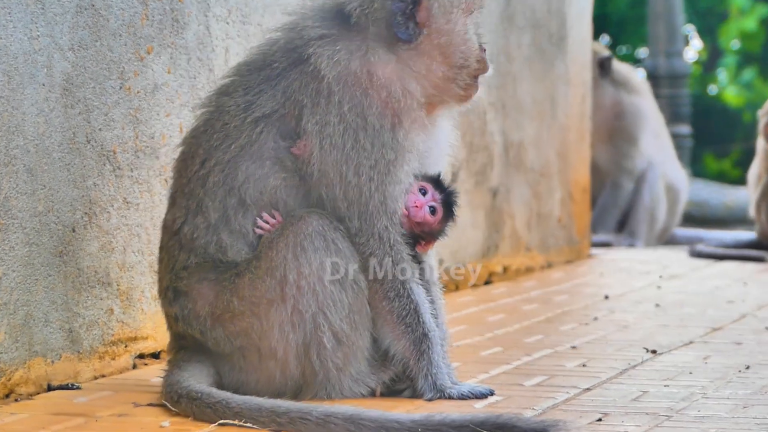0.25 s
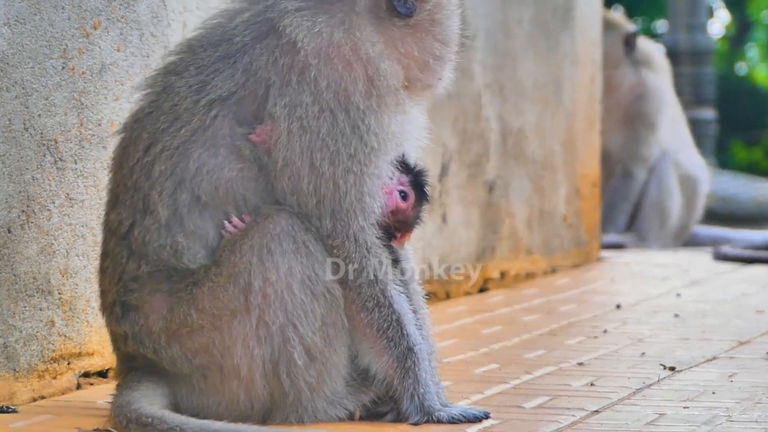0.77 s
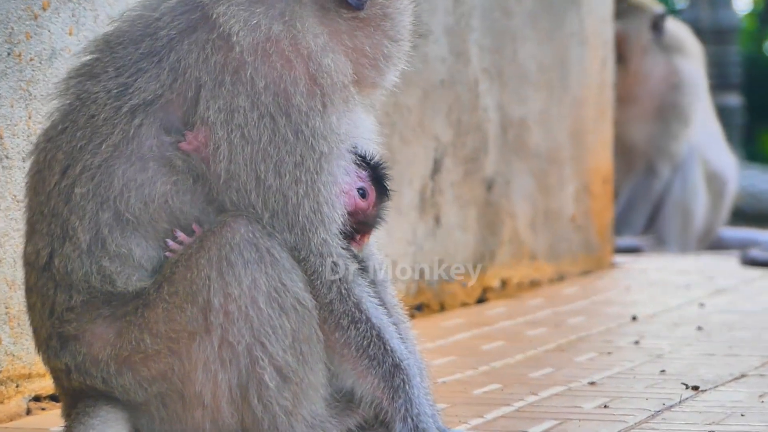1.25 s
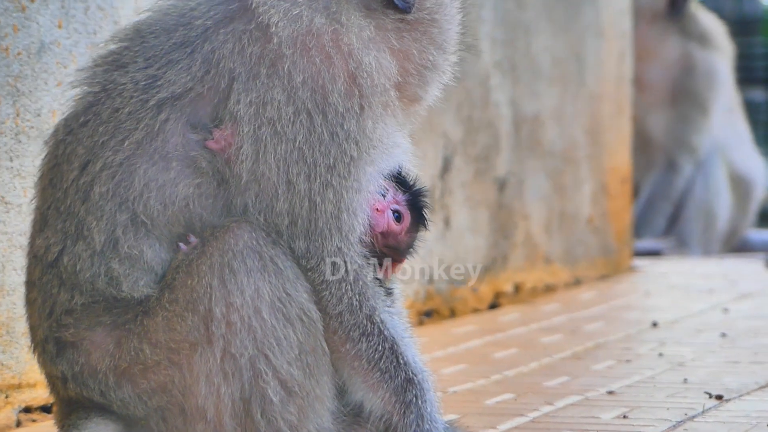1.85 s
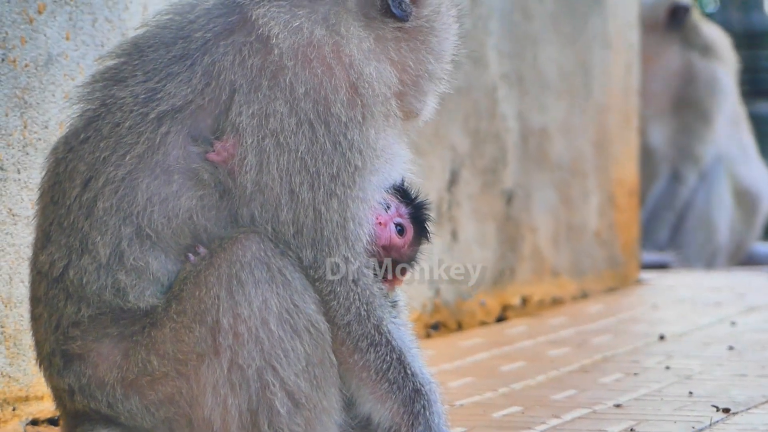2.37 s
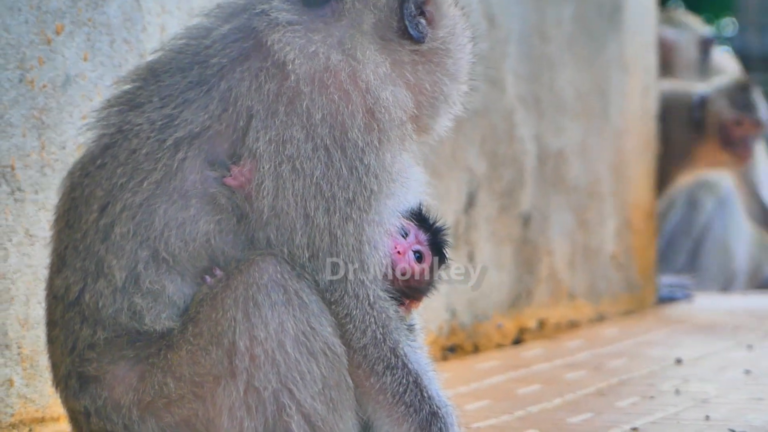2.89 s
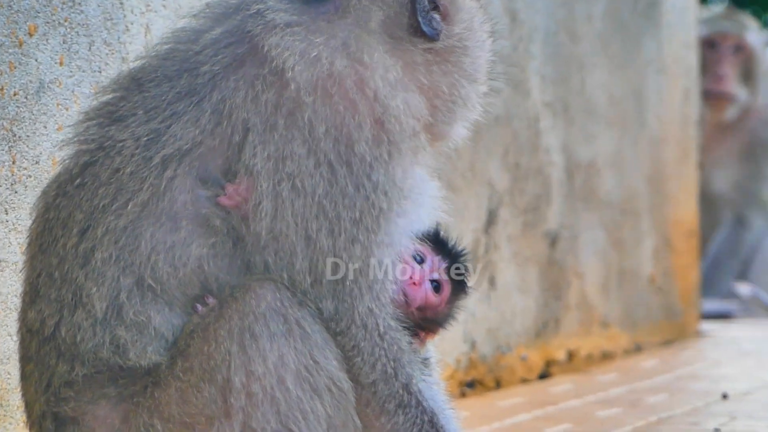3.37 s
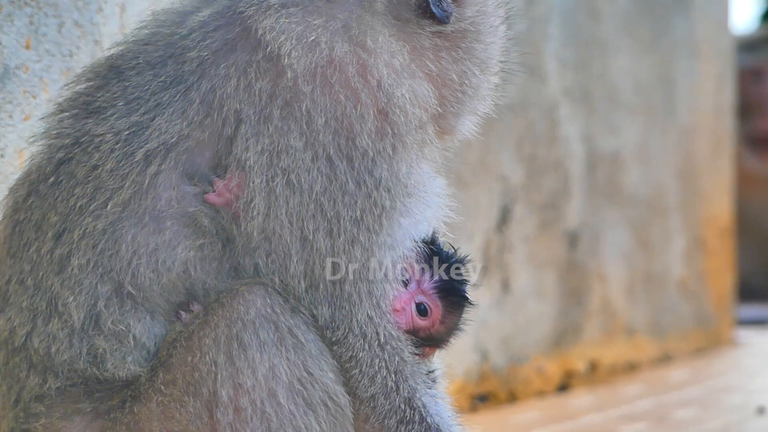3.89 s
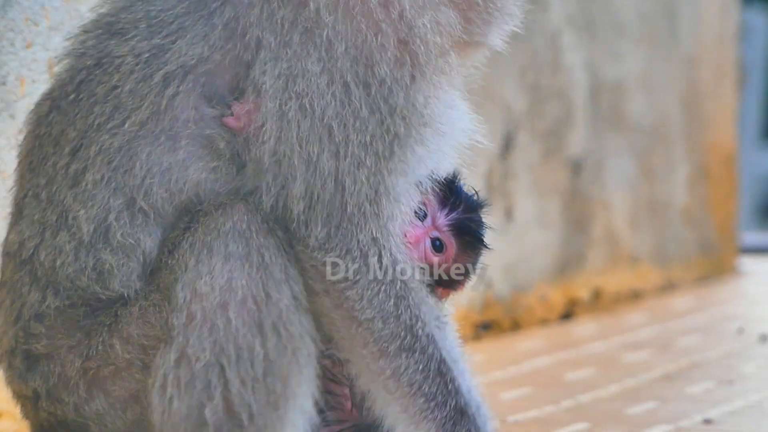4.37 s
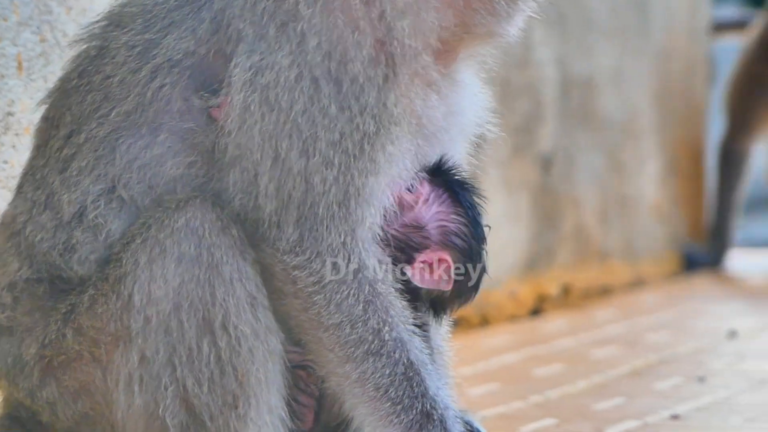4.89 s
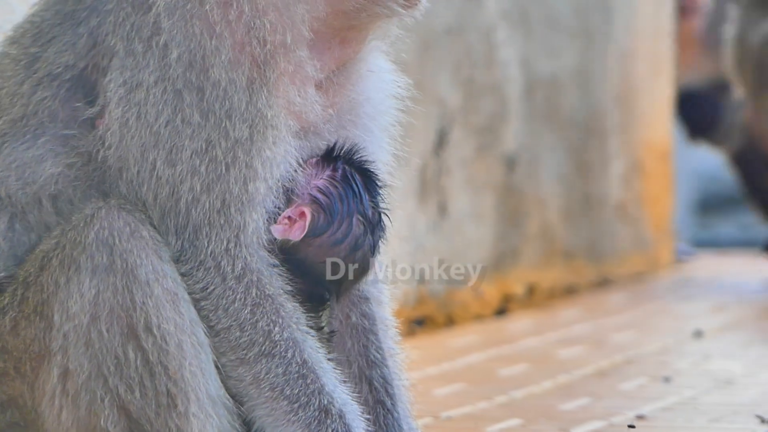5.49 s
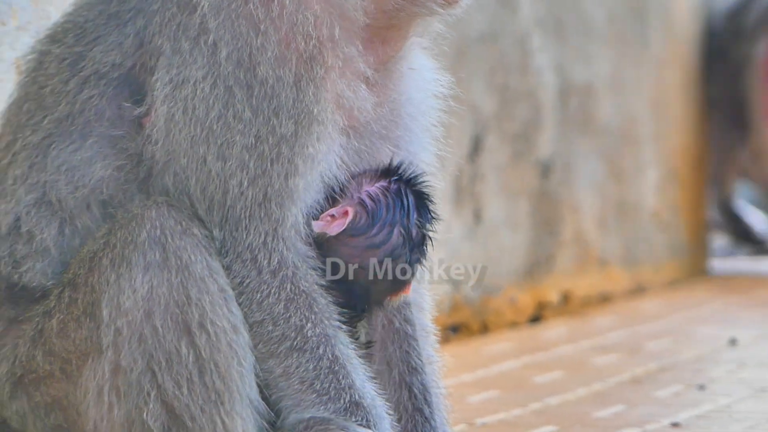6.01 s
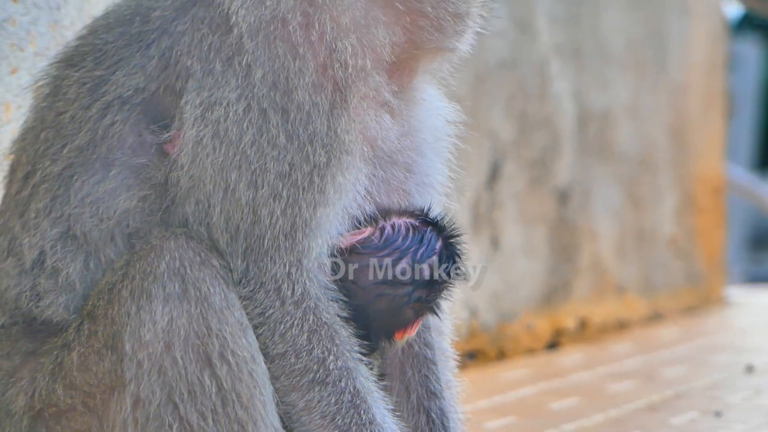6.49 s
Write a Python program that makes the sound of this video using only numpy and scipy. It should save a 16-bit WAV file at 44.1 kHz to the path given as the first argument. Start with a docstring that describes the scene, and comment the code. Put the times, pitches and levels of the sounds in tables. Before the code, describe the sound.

Young monkeys give quick raspy squeaks on a tiled terrace over distant traffic, then one shrill squeal and a soft, pure coo.

```python
"""A low rumble, distant traffic and faint hiss open on a tiled terrace, where young macaques squeak in bursts.
One macaque breaks into a long squeal and later one coos softly; small peeps and two hoots fall between.
Each call is a shaky vocal-fold tone; all but the squeal's pure tones add overtones and rasp from a tiny throat.
Wall and tiles answer briefly; shaped noise makes the paws' scuffs, the traffic, the hiss and a shuffling body."""
import sys
import numpy as np
from scipy import signal
from scipy.fft import rfft, irfft, next_fast_len
from scipy.io import wavfile
from scipy.ndimage import uniform_filter1d, map_coordinates

SR = 44100
rng = np.random.default_rng(int(sys.argv[2]) if len(sys.argv) > 2 else 0)


def dump(signal):
    """Clip the signal to [-1, 1] and save it as 16-bit WAV at the path in sys.argv[1]."""
    limited = np.clip(np.atleast_2d(signal).T, -1, 1)
    pcm = np.round(limited * 32767).astype(np.int16)
    wavfile.write(sys.argv[1], SR, pcm)


N = 297454
TOP_HZ = 15100  # upper edge of the whole sound
SETTLE = 1.8  # a short call starts taut, sinks quickly, then settles: the power of that curve

# Lowest throat resonance, which lifts the fundamental. Each row: frequency in Hz, gain in dB.
MOUTH_RESONANCE = [(1500, -19.5), (2400, 0.5), (3300, -1), (3800, -5), (4300, -9.5), (4900, -20)]
# Falling pitch at the squeal's end. Each row: time in seconds, pitch in Hz.
SQUEAL_END_PITCH = [(4.76, 4330), (4.782, 3990), (4.793, 3624), (4.81, 3224), (4.837, 3014)]


def amp(db):
    """Decibels to gain."""
    return 10 ** (np.asarray(db) / 20)


def unit(x):
    """x at rms 1."""
    return x / np.sqrt(np.mean(x ** 2) + 1e-20)


def along(points, hz):
    """Values at hz, read from (Hz, value) points on a log frequency axis."""
    f, v = np.transpose(points)
    return np.interp(np.log(np.abs(hz) + 1), np.log(f + 1), v)


def curves(rows, t):
    """Each column after the time, read at the times t."""
    s, *cols = np.transpose(rows)
    return [np.interp(t, s, c) for c in cols]


def wobble(rate, size):
    """A smooth random curve, rate knots a second."""
    knots = rng.standard_normal(4096)
    return map_coordinates(knots, [np.arange(size) * rate / SR], mode="wrap")


def filtered(x, response):
    """x times a response of frequency."""
    size = x.shape[-1]
    m = next_fast_len(size + 4096)
    return irfft(rfft(x, m) * response(np.fft.rfftfreq(m, 1 / SR)), m)[..., :size]


def noise(size):
    """White noise, up to a second long."""
    return rng.standard_normal(SR)[:size]


def add(track, s, x):
    """Mix x into the track at time s."""
    part = track[round(s * SR):][:len(x)]
    part += x[:len(part)]


def moments(start, end):
    """Times through a call, and the share of it that has passed."""
    u = np.linspace(0, 1, 60)
    return start + (end - start) * u, u


def rush(spectrum, patchy_db):
    """Stereo noise of rms 1: patches of random gain in time and pitch, likeness of the sides set by frequency."""
    # Each row: frequency in Hz, left-right likeness from 0 to 1.
    likeness = [(60, 0.18), (130, 0.62), (290, 0.66), (640, 0.065), (1410, 0.12), (3100, 0.62),
                (6820, 0.72), (15000, 0.12)]
    z = signal.stft(rng.standard_normal((2, N)), nperseg=1024)[2]
    field = uniform_filter1d(rng.standard_normal(z.shape[1:]), size=5, axis=0)
    field = uniform_filter1d(field, size=9, axis=1)
    pair = signal.istft(z * amp(patchy_db * unit(field)), nperseg=1024)[1][:, :N]

    def mid_side_colour(hz):
        turn = np.arccos(np.clip(along(likeness, hz), -1, 1)) / 2
        return amp(along(spectrum, hz)) * [np.cos(turn), np.sin(turn)]

    mid, side = filtered(pair, mid_side_colour)
    return unit(np.array([mid + side, mid - side]))


def rumble(t):
    """Deep noise round 100 Hz, strongest at the start and swelling again at the end."""
    # Each row: time in seconds, level in dB.
    swell = [(0, -59), (.3, -61), (.55, -71), (6.2, -82), (6.55, -77), (6.74, -62)]
    spectrum = [(15, -60), (30, -25), (50, -5), (70, 2), (110, 13), (200, -31), (500, -90)]  # (Hz, dB)
    return amp(curves(swell, t)[0]) * rush(spectrum, patchy_db=2.5)


def traffic_and_air(t):
    """Distant traffic as low noise and outdoor air as faint hiss, each drifting in level."""
    # Each row: time in seconds, traffic level in dB, air level in dB.
    levels = [(0, -55.5, -62.5), (2.5, -51.5, -62), (3.6, -55, -64.5), (4.4, -51, -59), (4.7, -56, -61),
              (5.2, -52, -60.5), (6.74, -52, -62)]
    # Colour of the traffic. Each row: frequency in Hz, gain in dB.
    traffic_colour = [(15, -68), (25, -34), (72, -11.5), (128, -14), (152, -5), (182, -6.5), (220, -1.5),
                      (307, -13), (364, -9), (396, -10.5), (536, -14), (714, -23.5), (803, -17.5),
                      (1180, -54), (1400, -33), (1820, -76), (3080, -120)]
    # Colour of the air. Each row: frequency in Hz, gain in dB.
    air_colour = [(30, -41), (590, -2.5), (1000, 2.5), (1200, -1), (1360, -2), (2130, -5), (2310, -5),
                  (2680, -4.5), (7530, -12.5), (8340, -10.5), (14100, -19), (15500, -19)]
    traffic_db, air_db = curves(levels, t)
    traffic = amp(traffic_db) * rush(traffic_colour, patchy_db=1.5)
    return traffic + amp(air_db) * rush(air_colour, patchy_db=2.4)


def engine_drone(drone_hz=213, drone_db=-62):
    """A distant engine: one low sine that wavers in pitch and level."""
    pitch = drone_hz * (1 + 0.0506 * wobble(25, N))
    drone = np.sin(2 * np.pi * np.cumsum(pitch) / SR) * amp(7.0 * wobble(7, N))
    return amp(drone_db) * unit(drone)


def shuffle(t):
    """A body rubbing the floor close by: noise that stays faint until it stirs near the end."""
    # Each row: time in seconds, level in dB before a small random waver.
    stirring = [(6.2, -64.5), (6.34, -57), (6.48, -60), (6.6, -53), (6.67, -54), (6.74, -51)]
    # Colour of the rub. Each row: frequency in Hz, gain in dB.
    rub_colour = [(30, -30), (150, -5), (350, 1), (700, -2.5), (1200, -7), (2200, -7.5), (3000, -25),
                  (12000, -50)]
    return amp(curves(stirring, t)[0] + 1.7 * wobble(60, N)) * rush(rub_colour, patchy_db=2.26)


def span(rows, attack=0.0029, release=0.0051):
    """The sample times of a call, and the gate that opens and shuts it over attack and release seconds."""
    t = np.arange(round(rows[0][0] * SR), round(rows[-1][0] * SR)) / SR
    return t, np.clip((t - t[0]) / attack, 0, 1) * np.clip((t[-1] - t) / release, 0, 1)


def folds(pitch, rough, jitter=0.0974, jitter_rate=1700, waver=0.047, waver_rate=280, shimmer_db=0.0):
    """Phase and strength of the vocal folds: roughness shakes the pitch, and the strength by shimmer_db."""
    size = len(pitch)
    shake = jitter * wobble(jitter_rate, size) + waver * wobble(waver_rate, size)
    phase = 2 * np.pi * np.cumsum(pitch * (1 + rough * shake)) / SR
    return phase, unit(amp(shimmer_db * rough * wobble(597.5, size)))


def voice(rows, throat, treble_db=0, slope_db=-3.0, tripling=0.37, flutter_db=4.0, low_edge=0.41, ripple_db=2.1,
          rasp_share=.75):
    """One call: a fundamental, overtones through the throat, and rasp that grows with roughness.

    Rows hold time in seconds, pitch in Hz, fundamental and upper level in dB, roughness from 0 to 1."""
    # Colour of the rasp. Each row: frequency in Hz, gain in dB.
    rasp_colour = [(1200, -36), (1800, 4), (2400, -6), (3600, -1.5), (5000, -7), (6500, -5.5), (7200, -6.5),
                   (8100, 2), (9300, 9), (10400, 2.5), (12000, 2.5), (14300, 12.5), (16000, -28)]
    t, gate = span(rows)
    size = len(t)
    pitch, low_db, high_db, rough = curves(rows, t)
    phase, strength = folds(pitch, rough)

    def flutter():
        """In a rough voice each partial swells on its own."""
        return unit(amp(flutter_db * rough * wobble(266.0, size)))

    k = np.arange(2, 10)[:, None]  # overtone numbers
    gains = amp(along(throat, k * pitch) + slope_db * np.log2(k))
    gains *= k * pitch < TOP_HZ + 2000
    gains /= np.linalg.norm(gains, axis=0) + 1e-9
    overtones = np.sqrt(2) * np.sum(gains * [flutter() for _ in k] * np.sin(k * phase), axis=0)

    # strained folds repeat every third cycle, which adds side tones round the fundamental
    fundamental = unit(flutter() * np.sin(phase) * (1 + tripling * rough * np.cos(phase / 3)))
    # nothing much sounds below a share of the lowest pitch
    low_cut = lambda hz: (1 + (low_edge * pitch.min() / (hz + 20)) ** 12) ** -.5
    fundamental = unit(filtered(fundamental, low_cut))

    # the rasp's band follows the call's mean pitch, and each call's mouth shape ripples it differently
    ripple = list(zip(np.linspace(1000, TOP_HZ, 20), rng.standard_normal(20)))

    def rasp_response(hz):
        ratio = hz / pitch.mean()
        band = ((1 + (ratio / 1.78) ** 4) * (1 + (0.86 / (ratio + 0.012)) ** 14)) ** -.5
        return amp(along(rasp_colour, hz) + ripple_db * along(ripple, hz)) * band

    rasp = unit(filtered(noise(size), rasp_response))
    share = np.clip(rasp_share * rough ** 1.66, 0, 1)
    upper = np.sqrt(1 - share) * overtones + np.sqrt(share) * rasp
    upper = filtered(upper, lambda hz: amp(along([(9500, 0.0053), (14000, treble_db)], hz)))
    return gate * strength * (amp(low_db) * fundamental + amp(high_db) * upper)


def whistle(rows):
    """A single shaky tone without overtones; rows hold seconds, pitch in Hz, level in dB, roughness."""
    t, gate = span(rows)
    pitch, db, rough = curves(rows, t)
    phase, strength = folds(pitch, rough, jitter=0.173, waver=.06, shimmer_db=14.5)
    return gate * strength * amp(db) * np.sqrt(2) * np.sin(phase)


def peep(s, length, start_hz, end_hz, db, overtones_db, rough=0.21, fade_db=0.5):
    """A peep, or the trailing end of one: a fairly clean little glide that fades slightly."""
    t, u = moments(s, s + length)
    pitch = end_hz + (start_hz - end_hz) * (1 - u) ** SETTLE
    level = db - fade_db * (u - .5)
    return np.transpose([t, pitch, level, level + overtones_db, np.full_like(u, rough)])


def paws(octaves=0.56):
    """Brief scuffs and ticks of paws on the tiles: gritty bursts of noise round a centre frequency."""
    # Each row: start in seconds, length in seconds, centre in Hz, level in dB.
    scuffs = [(0.206, 0.045, 10000, -64.5), (0.558, 0.048, 6000, -56.5), (0.979, 0.033, 5500, -62),
              (3.191, 0.0074, 6840, -53), (4.273, 0.041, 5630, -60), (4.506, 0.0042, 1970, -49.5),
              (4.676, 0.005, 2280, -54.5)]
    track = np.zeros(N)
    for s, length, centre_hz, db in scuffs:
        size = int(length * SR)
        bell = lambda hz: np.exp(-.5 * (np.log2((hz + 1) / centre_hz) / octaves) ** 2)
        grit = filtered(noise(size), bell)
        add(track, s, amp(db) * unit(grit * np.hanning(size) * amp(6.7 * wobble(390, size))))
    return track


def squeak(s, length, start_hz, end_hz, rough, db, overtones_db, fade_db=2, fade_db_per_octave=27, fray=0.36):
    """As the pitch moves, the overtones follow it, the voice frays and the mouth's resonance lifts the fundamental."""
    t, u = moments(s, s + length)
    pitch = end_hz + (start_hz - end_hz) * (1 - u) ** SETTLE
    fade = fade_db * (u - .5)
    low_db = db + along(MOUTH_RESONANCE, pitch) - fade
    high_db = db + overtones_db + fade_db_per_octave * np.log2(pitch / pitch.mean()) - fade
    return np.transpose([t, pitch, low_db, high_db, rough * (1 + fray * (u - .5))])


def arch(fundamental_db=1.0, swell_db=5, rough_start=0.07, rough_end=.95):
    """A squeak that starts clean, arches, then frays and sinks into its fundamental."""
    # Each row: time in seconds, pitch in Hz, overtone level in dB.
    contour = [(.804, 5000, -42), (0.825, 5190, -38.5), (.843, 4910, -39), (.858, 4300, -44.5),
               (0.881, 3820, -48.5)]
    t, u = moments(contour[0][0], contour[-1][0])
    pitch, db = curves(contour, t)
    low_db = db + fundamental_db + swell_db * u + along(MOUTH_RESONANCE, pitch)
    return np.transpose([t, pitch, low_db, db, rough_start + (rough_end - rough_start) * u ** 1.5])


def hoot(s, length, start_hz, end_hz, db):
    """A short, low, nearly clean call whose overtones fade as it ends."""
    return [(s, start_hz, db, db - 6, .08), (s + length, end_hz, db, db - 15, .08)]


def screech(start_hz=4150, held_hz=5200, rise_s=.04, fundamental_db=-22, overtones_db=2.5, rough=0.86,
            clear_s=4.57, clear_for_s=0.019, clearing=0.77):
    """The squeal opens by rising to a harsh held pitch, which clears for an instant as the whistle takes over."""
    # Each row: time in seconds, level in dB before the fundamental and overtone offsets.
    levels = [(4.495, -56.5), (4.525, -30), (4.573, -31), (4.585, -59), (4.687, -61), (4.76, -57)]
    t, u = moments(levels[0][0], levels[-1][0])
    db, = curves(levels, t)
    pitch = np.interp(t - t[0], [0, rise_s], [start_hz, held_hz])
    clear = clearing * np.exp(-((t - clear_s) / clear_for_s) ** 2)
    return np.transpose([t, pitch, db + fundamental_db, db + overtones_db, rough * (1 - clear)])


def top_register(rough=0.158, clear_s=4.64, clear_for_s=0.033, clearing=0.8, flicker_db=0.5, flicker_rate=130):
    """The squeal's thin, high whistle flickers in level, and is purest near the middle."""
    # Each row: time in seconds, level in dB before the flicker.
    levels = [(4.55, -40), (4.58, -30), (4.626, -39), (4.646, -28), (4.694, -40), (4.746, -28.5),
              (4.772, -31.5), (4.8, -47)]
    # Each row: time in seconds, pitch in Hz.
    pitches = [(4.55, 13200), (4.59, 13760), (4.66, 14000), (4.676, 14550), (4.705, 14450), (4.745, 12930),
               (4.8, 12340)]
    t, u = moments(levels[0][0], levels[-1][0])
    pitch, = curves(pitches, t)
    db, = curves(levels, t)
    flicker = wobble(flicker_rate, SR)[((t - t[0]) * SR).astype(int)]
    clear = clearing * np.exp(-((t - clear_s) / clear_for_s) ** 2)
    return np.transpose([t, pitch, db + flicker_db * flicker, rough * (1 - clear)])


def close(rough_start=0.65, rough_end=0.02, fundamental_db=-.5, overtones_db=-2):
    """The squeal ends falling, and turns clean as the strain goes."""
    # Each row: time in seconds, then fundamental and overtone level in dB before their offsets.
    levels = [(4.76, -56, -50), (4.772, -49.5, -34), (4.79, -32, -36), (4.804, -33.5, -28),
              (4.837, -42, -57)]
    t, u = moments(levels[0][0], levels[-1][0])
    pitch, = curves(SQUEAL_END_PITCH, t)
    low_db, high_db = curves(levels, t)
    rough = np.interp(u, [0, 1], [rough_start, rough_end])
    return np.transpose([t, pitch, low_db + fundamental_db, high_db + overtones_db, rough])


def slide(start=4.785, end=4.839, start_hz=5400, end_hz=4300, bend=2.84, db=-35.5, swell_db=5.0, rough=0.99):
    """A second, independent tone in the close: it drops ever faster, swells and clears."""
    t, u = moments(start, end)
    pitch = start_hz + (end_hz - start_hz) * u ** bend
    return np.transpose([t, pitch, db + swell_db * u, rough * (1 - u) ** 2.0])


def undertone(start=4.787, end=4.823, db=-57, rough=0.16):
    """In the close the folds also sound faintly an octave down."""
    t, u = moments(start, end)
    pitch = curves(SQUEAL_END_PITCH, t)[0] / 2
    return np.transpose([t, pitch, np.full_like(u, db), np.full_like(u, rough)])


def coo(soft_db=-66, firm_db=-48, soft_overtones_db=-68, firm_overtones_db=-55, soft_rough=0.29, firm_rough=0.027):
    """The coo quavers while it is soft, and turns pure as it firms."""
    # Each row: time in seconds, pitch in Hz, fundamental level in dB.
    contour = [(5.74, 1617, -65), (5.762, 1557, -66), (5.89, 1667, -62), (5.916, 1528, -60),
               (6.026, 1537, -51), (6.044, 1548, -55.5), (6.086, 1567, -50), (6.138, 1523, -45.5),
               (6.152, 1576, -59), (6.192, 1585, -59), (6.215, 1760, -65)]
    t, pitch, db = np.transpose(contour)
    firm = lambda when_soft, when_firm: np.interp(db, [soft_db, firm_db], [when_soft, when_firm])
    overtones_db = firm(soft_overtones_db, firm_overtones_db)
    return np.transpose([t, pitch, db, overtones_db, firm(soft_rough, firm_rough)])


def monkeys():
    """Peeps, squeaks, hoots, the long squeal and the coo, each voice sent through its throat colour."""
    # Small clean peeps; the rows at 4.065 and 4.19 repeat the peeps just before them more faintly, and the row
    # at 5.439 is the trailing end of the peep before it. # Each row: start in seconds, length in seconds, start
    # pitch in Hz, end pitch in Hz, level in dB, # overtones over it in dB.
    peeps_and_tails = [(.158, 0.031, 1616, 1590, -66, 6.5), (3.21, 0.015, 1884, 1796, -48, -7.5),
                       (4.046, 0.02, 1804, 1681, -44.5, -5), (4.065, 0.039, 1708, 1477, -51.5, 1),
                       (4.171, 0.012, 1690, 1640, -48, 1.5), (4.19, 0.023, 1657, 1576, -61, 8.5),
                       (5.421, 0.019, 1562, 1456, -51.5, 5.5), (5.439, 0.0416, 1410, 1470, -58, -2.5),
                       (6.301, 0.0247, 2820, 2318, -45, -3)]
    # Raspy squeaks, and at 4.364 a low undertone sounding within the squeak before it.
    # Each row: start in seconds, length in seconds, start pitch in Hz, end pitch in Hz,
    # mid-call roughness from 0 to 1, level in dB before resonance and fade, overtones over it in dB,
    # top octave in dB.
    squeaks_and_undertone = [(.299, 0.052, 3284, 3165, 0.9, -45, 2.5, 3),
                             (.475, 0.071, 4450, 3830, 0.58, -49.5, 6.5, -7),
                             (.612, 0.068, 4860, 4590, 0.38, -44, 2.5, 4),
                             (1.667, 0.035, 3420, 3285, 0.55, -54, -1.5, -21),
                             (1.78, 0.045, 3710, 3300, 0.71, -46.5, -4, -13),
                             (1.926, 0.048, 4126, 3443, 0.82, -34.5, -1.5, -5.5),
                             (2.181, 0.047, 4794, 3555, 0.72, -32, -4.5, -8),
                             (2.345, 0.044, 4790, 3683, 0.4, -32, -3.5, -14),
                             (2.527, 0.055, 4644, 3594, 0.75, -30, -2, -6),
                             (2.758, 0.042, 4380, 3200, 0.83, -38.5, 3.5, -5),
                             (2.922, 0.065, 4070, 3650, 0.77, -38.5, 2, -2.5),
                             (4.343, .043, 3760, 3110, 0.55, -34, -2.5, -8),
                             (4.364, 0.0315, 2075, 2215, 0.3, -38, -11, 0),
                             (6.514, .036, 2375, 1653, 0.65, -34, -8.5, -13)]
    # Low hoots of other animals. Each row: start in seconds, length in seconds, start pitch in Hz,
    # end pitch in Hz, level in dB.
    hoots = [(1.357, 0.043, 950, 1032, -58.5), (6.538, 0.019, 645, 630, -45)]
    # Throat colour of the peeps. Each row: frequency in Hz, gain in dB.
    peep_throat = [(1500, 2), (3000, 3.5), (4400, -10), (5400, -1.5), (6500, 2), (7500, -12), (9000, 6),
                   (10500, -11), (12000, 2), (15000, -17)]
    # Throat colour of squeaks and squeal. Each row: frequency in Hz, gain in dB.
    squeak_throat = [(1500, -14), (2200, 8), (3200, 24), (4200, -14), (5300, 10), (6400, 0.5), (7200, -2),
                     (8200, -11), (9300, 4.5), (10500, -0.5), (12000, 6.5), (14200, -11), (16000, 6)]
    # Throat colour of coo and hoots. Each row: frequency in Hz, gain in dB.
    coo_throat = [(3100, 8.5), (4650, -1.5), (6200, -9), (7700, -20), (9300, 13), (10800, -30), (12400, -4),
                  (15000, -15)]
    track = np.zeros(N)
    for part in peeps_and_tails:
        add(track, part[0], voice(peep(*part), peep_throat, treble_db=-6.5))
    for *part, treble_db in squeaks_and_undertone:
        add(track, part[0], voice(squeak(*part), squeak_throat, treble_db))
    for call in hoots:
        add(track, call[0], voice(hoot(*call), coo_throat))
    for rows in (arch(), screech(), close()):
        add(track, rows[0][0], voice(rows, squeak_throat))
    for rows in (top_register(), slide(), undertone()):
        add(track, rows[0][0], whistle(rows))
    rows = coo()
    add(track, rows[0][0], voice(rows, coo_throat))
    return track


def walls(x, lean=0.36):
    """Distinct echoes, in turn from slightly right and slightly left."""
    # Single reflections. Each row: delay in seconds, level in dB.
    reflections = [(.0019, -30.5), (.0082, -22.5), (.0235, -17), (.047, -17.5), (.0508, -21)]
    out = np.zeros((2, N))
    for i, (delay, db) in enumerate(reflections):
        side = -lean * (-1) ** i
        echo = np.pad(x, (int(delay * SR), 0))[:N]
        out += amp(db) * np.outer([1 + side, 1 - side], echo)
    return out


def terrace(x, early_db=-10, early_t60=0.027, tail_db=-10, width=0.47, gap=.004):
    """Quick scatter from wall and tiles, then a short tail, mostly from the front and wider in the treble."""
    # Colour of the tail. Each row: frequency in Hz, gain in dB.
    tail_colour = [(500, -9), (2000, 1.5), (3600, 3), (7000, -4), (9500, -5), (12000, -8.5), (14500, -21.5)]
    # Each row: frequency in Hz, time to fall by 60 dB in seconds.
    decay_times = [(500, 0.38), (3500, 0.46), (6000, 0.59), (9500, 0.46), (14000, 0.65)]
    hz, t, z = signal.stft(rng.standard_normal((2, SR // 2)), SR, nperseg=256)
    tail_level = along(tail_colour, hz)[:, None] - 60 * t / along(decay_times, hz)[:, None]
    tail = signal.istft(z * amp(tail_level), SR, nperseg=256)[1]
    age = np.arange(tail.shape[1]) / SR
    early = rng.standard_normal(tail.shape) ** 3 * amp(-60 * age / early_t60)  # cubing makes it sparse
    answer = np.zeros(tail.shape)
    for db, part in ((early_db, early), (tail_db, tail)):
        answer += amp(db) * part / np.linalg.norm(part, axis=1, keepdims=True)
    delayed = np.pad(x, (int(gap * SR), 0))
    mid, side = signal.fftconvolve(delayed[None], answer, axes=1)[:, :N]
    side = width * filtered(side, lambda hz: amp(along([(5000, -3.0), (12000, 5.5)], hz)))
    return np.array([mid + side, mid - side])


def scene():
    """The animals and their echoes on the terrace, over rumble, traffic, air, drone and shuffling."""
    # Balance of the direct sound. Each row: time in seconds, left over right in dB.
    balance = [(0, 1), (2.5, 2.2), (4.8, 0.5), (6, 1), (6.52, 8.5)]
    t = np.arange(N) / SR
    background = rumble(t) + traffic_and_air(t) + engine_drone() + shuffle(t)
    near = monkeys() + paws()
    pan_db = curves(balance, t)[0]
    direct = near * amp([pan_db / 2, -pan_db / 2])
    return direct + walls(near) + terrace(near) + background


def record(dry, dip_hz=7130, dip_width_hz=190, dip_db=-7):
    """The microphone has a narrow dip in the treble, and the sound ends steeply above TOP_HZ."""
    dipped = filtered(dry, lambda hz: amp(dip_db * np.exp(-((hz - dip_hz) / dip_width_hz) ** 2)))
    return filtered(dipped, lambda hz: 1 / np.sqrt(1 + (hz / TOP_HZ) ** 160))


dry = scene()
out = record(dry)
dump(out)
```